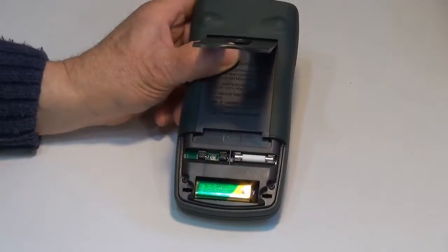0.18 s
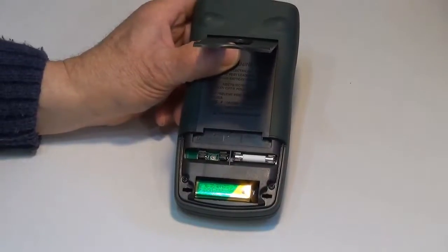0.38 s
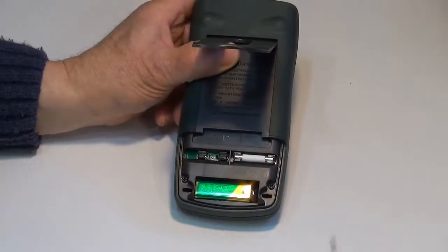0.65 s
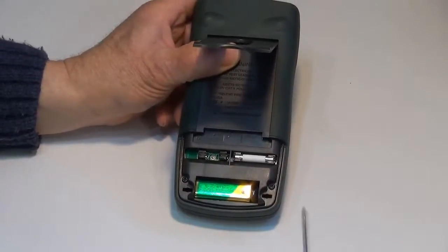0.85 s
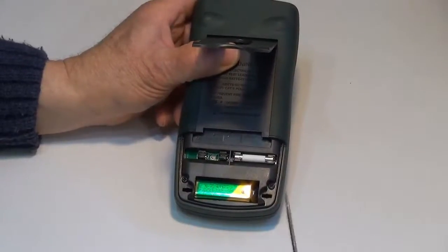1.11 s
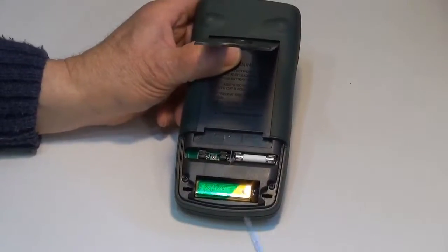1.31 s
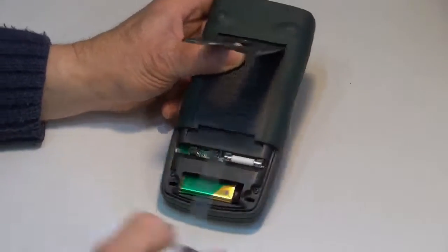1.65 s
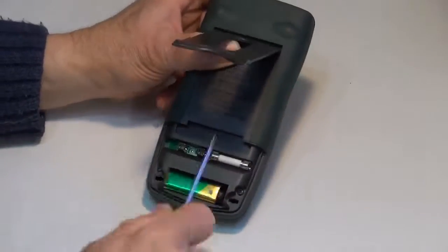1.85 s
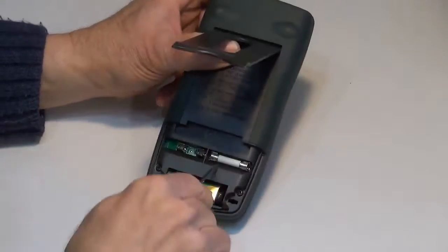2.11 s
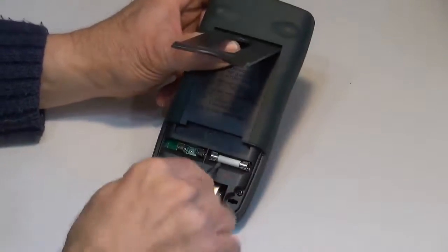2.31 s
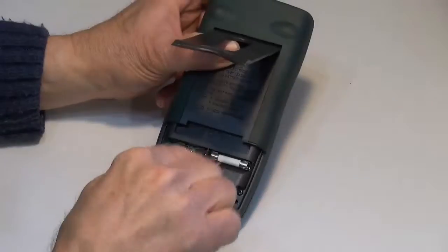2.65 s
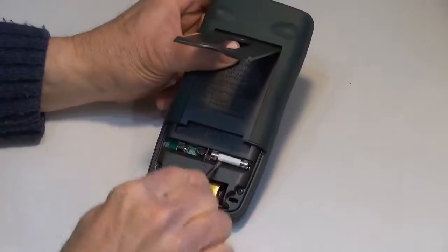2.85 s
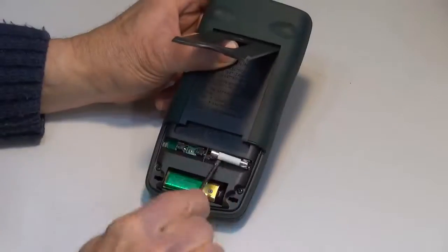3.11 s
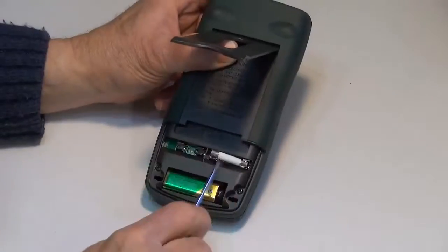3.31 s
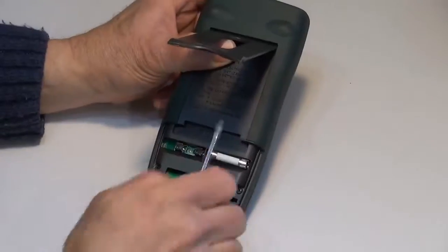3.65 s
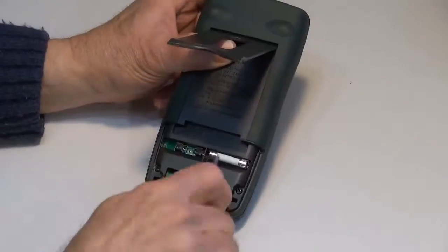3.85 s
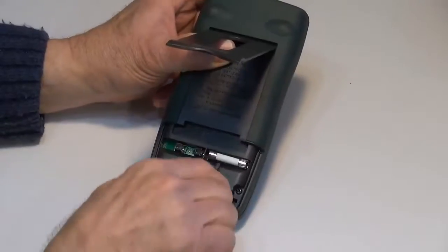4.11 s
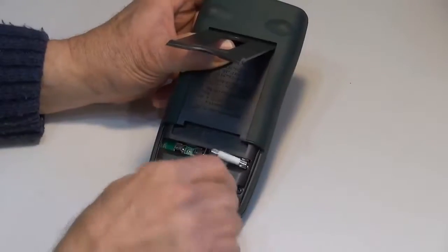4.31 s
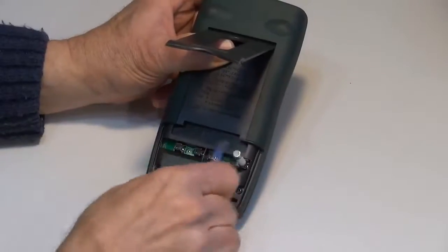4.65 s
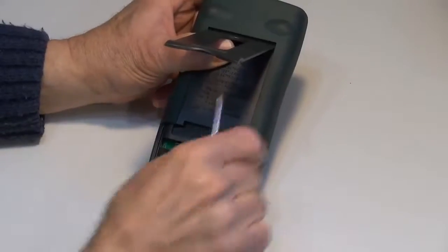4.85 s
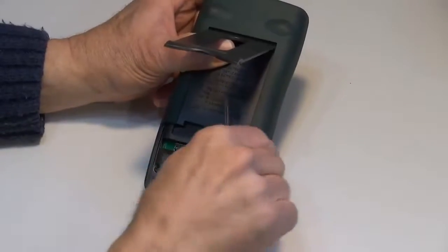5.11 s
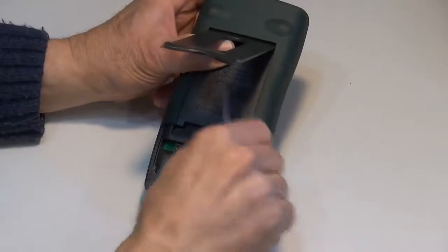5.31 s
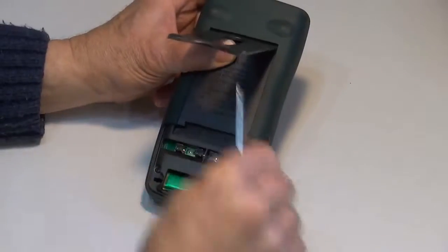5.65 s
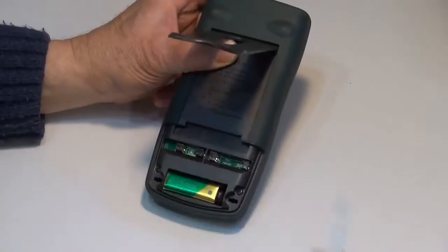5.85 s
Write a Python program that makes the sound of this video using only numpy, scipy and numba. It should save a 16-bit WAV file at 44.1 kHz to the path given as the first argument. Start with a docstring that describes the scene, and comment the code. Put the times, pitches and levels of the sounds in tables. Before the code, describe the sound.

Close, nearly mono sound of a hollow plastic meter being handled on a desk in a small, quiet room, with steady soft hiss and very faint low hum. It opens with a light scuff and faint ticks; at 0.52 s a hard, bright snap breaks into rapid clicks, with rubbing around 0.6, then a hollow clack at 0.93 and tiny ticks to 1.03. Quiet follows, with a soft tap and slide near 1.5 and faint ticks at 1.75. A clack rings briefly at 2.16, with two more near 2.3. Soft scrapes and small knocks from 2.9 lead to a bright metallic snap at 3.38 with a short ring. Then it is nearly still until light prying from 4.1 to 4.6, rubbing with a faint squeaky creak around 4.3. A clack at 5.35 starts the strongest cluster, with a very sharp crack at 5.44 and several snaps to 5.51, ringing shortly, before faint sliding fades into hiss.

```python
"""Levering fuses from a plastic meter

A hand-held plastic meter lies on a desk while a screwdriver levers fuses out of spring clips.
Each click is an impulse exciting damped modes of the hollow case, its stiff panels and the metal parts.
Sliding hands, case and blade rub the same modes with dense noise grains; a clip creaks by random slips
through resonances, and the desk thuds. A small room answers with decaying noise, over steady hiss and mains hum.
"""
import sys
import numpy as np
from scipy import signal
from scipy.fft import rfft, irfft
from scipy.io import wavfile
from scipy.ndimage import uniform_filter1d
from numba import njit

SR = 44100
rng = np.random.default_rng(int(sys.argv[2]) if len(sys.argv) > 2 else 0)


def store_pcm(level_fs):
    """Save levels as 16-bit WAV."""
    pcm = np.round(np.clip(level_fs, -1, 1) * 32767).astype(np.int16)
    wavfile.write(sys.argv[1], SR, np.atleast_2d(pcm).T)


N = 263277  # samples

# Blows on the meter. Each row: start in seconds, panel, hollow and metal peaks in dB,
# hollow, panel and metal notes in Hz, rattle time in ms, level of the notes in dB.
CLICKS = [(0.068, -26, -37, -52, 447, 2400, 5400, 0.92, 3),
          (0.0992, -25.5, -50, -51, 1060, 2090, 5570, 1.7, 12),
          (0.334, -25, -54, -36, 362, 2230, 5530, 1.2, -2),
          (0.5244, -2.5, -25, 0, 463, 2800, 6160, 0.88, 0),
          (0.5285, -15, -26, -15, 459, 2400, 5470, 1.4, 18),
          (0.5566, -7.5, -30.5, -6, 480, 3000, 6100, 0.58, 11),
          (0.5753, -10.5, -49, -12, 880, 4650, 6070, 0.34, 11),
          (0.588, -26, -47, -26, 880, 2900, 6070, 0.5, 10),
          (0.728, -33, -62, -50, 600, 2940, 5600, 0.82, 7),
          (0.905, -20.5, -54, -18, 376, 4570, 7060, 0.55, 8),
          (0.918, -22, -57, -14, 980, 5060, 7060, 0.59, 17),
          (0.9328, -4.5, -9, -18, 629, 2275, 5940, 0.72, 17.5),
          (1.0025, -20, -49, -23, 1010, 4470, 7100, 0.31, 11),
          (1.0098, -20, -41, -32, 1060, 4460, 5450, .4, 15),
          (1.017, -20, -45, -30, 1060, 4450, 5450, 0.71, 9),
          (1.0262, -25, -57, -17, 694, 4700, 5470, 0.57, 21),
          (1.030, -21, -55, -24, 694, 4450, 5770, .5, 12),
          (1.4809, -42, -30.5, -57, 619, 2280, 5540, 0.97, 28),
          (1.7295, -32.5, -50, -58, 610, 4800, 5830, 1.2, 34),
          (1.7753, -26.5, -41, -30, 413, 3480, 5600, 0.84, 21),
          (2.164, -20, -19, -11.5, 685, 2100, 7950, 0.52, 19),
          (2.2831, -18.5, -34.5, -22.5, 745, 2280, 7660, 1, 14),
          (2.3167, -18, -24, -19, 402, 3450, 5670, 0.69, 11),
          (2.9561, -43, -33, -41, 995, 2220, 5780, 2.9, 33),
          (3.0916, -43, -29, -54, 604, 2190, 8500, 1, -10),
          (3.1174, -37.5, -35, -35, 720, 2170, 6100, 2.4, 26),
          (3.2403, -37, -26.5, -41.5, 354, 1720, 5900, 2.1, 17),
          (3.3261, -41, -31, -48, 428, 2540, 5730, 1.9, 22),
          (3.3799, -48, -12.5, -3, 688, 5390, 6345, 0.9, 29.5),
          (4.127, -24.5, -36.5, -32, 355, 2360, 5500, 1.8, 9),
          (4.367, -37, -38, -31.5, 1040, 4900, 5720, 1.7, 36),
          (4.4346, -26.5, -27, -28.5, 707, 3500, 6250, 2.2, 19),
          (4.515, -62, -42.5, -65, 380, 2400, 5600, 1.8, 27),
          (4.534, -62, -38.5, -63, 405, 2390, 5600, 1.5, 33),
          (4.565, -41, -63, -55, 396, 3360, 5600, 1.8, 23),
          (5.3535, -12.5, -13.5, -10.5, 710, 2320, 5500, 2.1, 7),
          (5.4436, 0, -18, -0.1, 810, 4820, 6370, 1.3, -10),
          (5.467, -7, -19, -23, 785, 3810, 6500, 1.6, 30),
          (5.4807, -14, -18.5, -22, 348, 2900, 7200, 1.1, 1),
          (5.504, -10.5, -22, -15, 664, 3790, 7150, 3.2, 42),
          (5.5073, -6, -11, -45, 497, 2270, 6660, 1.9, 5)]
# Damped modes of the air-filled case, its stiff panels and the metal parts.
# Each row: frequency in Hz, 60 dB decay time in seconds (ring() allows no less than 3 ms), level in dB.
HOLLOW_MODES = [(387.5, 0.059, 9.5), (435, 0.074, 2.5), (643, 0.015, 16.5), (648, 0.016, 11),
                (722, 0.0071, 27.5), (860, 0.026, 13.5), (978, 0.099, 7.5)]
PANEL_MODES = [(2130, 0.047, -4.5), (2400, 0.026, 2), (2630, 0.0067, 9.5), (3150, 0.01, 8),
               (3410, 0.019, 2.5), (4070, 0.035, -3), (4350, 0.0094, 2.5), (4770, 0.0027, 3)]
METAL_MODES = [(4970, 0.0018, 9), (6080, 0.0014, -1), (7500, 0.0079, -11), (8880, 0.0013, -12.5)]
# Close pairs of tones that linger after some blows.
# Each row: start in seconds, frequency in Hz, 60 dB decay time in seconds, level in dB.
LINGERING_TONES = [(2.166, 727, .25, -40), (2.166, 2340, 0.13, -42), (3.383, 675, 0.41, -37),
                   (1.481, 580, 0.069, -38), (3.381, 6520, 0.25, -37), (5.355, 2324, 0.023, -15),
                   (5.356, 96, 0.093, -39), (5.446, 2580, 0.088, -23), (5.445, 4950, .08, -25),
                   (5.506, 3865, 0.17, -29), (5.508, 2115, 0.093, -23), (5.508, 2330, 0.091, -32)]
# Scraping and sliding strokes. Each row: start of the hold, hold, rise before it and fall after it in seconds
# (rise and fall span 20 dB), hollow, panel and metal levels in dB, hollow and panel spot centres in Hz.
STROKES = [(0.0, 0.0039, 0.017, 0.11, -30.5, -30.5, -36, 408, 2550),
           (0.149, 0.08, 0.085, 0.019, -50, -40, -54, 850, 2260),
           (0.254, 0.076, 0.061, 0.025, -52.5, -47.5, -79, 940, 2190),
           (0.343, 0.076, 0.012, 0.21, -42.5, -46.5, -47.5, 425, 2730),
           (0.563, 0.0071, 0.092, 0.093, -41.5, -34, -39.5, 816, 2320),
           (.635, 0.02, 0.081, 0.016, -43, -31.5, -38.5, 860, 1980),
           (0.666, 0.22, .05, 0.05, -58, -47, -80, 765, 2080),
           (0.852, 0.04, 0.027, 0.15, -61, -62, -45.5, 460, 3160),
           (0.933, 0.04, 0.084, 0.043, -37, -34.5, -37, 486, 3120),
           (1.004, 0.034, 0.044, 0.075, -46.5, -38, -62, 674, 2750),
           (1.539, 0.036, 0.13, 0.22, -51.5, -42, -51, 670, 3650),
           (2.202, 0.041, 0.015, 0.033, -54.5, -68, -65, 685, 2260),
           (2.353, 0.23, 0.08, 0.039, -53, -60.5, -63.5, 550, 3260),
           (2.546, 0.028, 0.011, 0.01, -49.5, -45, -56, 715, 2930),
           (2.901, .005, 0.06, 0.031, -56, -52, -58, 694, 2450),
           (2.97, .005, 0.053, 0.11, -49, -47.5, -53, 710, 2230),
           (3.094, 0.11, 0.044, 0.024, -49, -55, -58, 610, 2070),
           (3.245, 0.049, 0.03, 0.037, -42, -52, -54, 440, 2480),
           (3.353, 0.0055, 0.046, 0.016, -30.5, -40, -45, 422, 2460),
           (3.364, 0.0023, 0.007, 0.03, -40, -25, -34, 675, 4330),
           (3.377, 0.0049, 0.0035, 0.11, -37.5, -47, -51, 630, 4500),
           (3.584, 0.033, 0.15, 0.24, -61.5, -55.5, -60, 597, 3600),
           (3.906, .01, 0.042, 0.074, -59.5, -54.5, -56, 730, 3770),
           (4.221, 0.097, 0.0082, 0.042, -46, -44.5, -55, 640, 2067),
           (4.336, 0.096, 0.066, 0.055, -47, -48.5, -61, 950, 2190),
           (4.533, 0.019, 0.044, 0.047, -48, -55.5, -58, 430, 2920),
           (4.746, .01, 0.037, 0.059, -84.5, -57.5, -54, 600, 3440),
           (4.998, 0.031, 0.28, 0.039, -50.5, -57.5, -67, 378, 3200),
           (5.349, .005, 0.065, 0.12, -44.5, -48, -46.5, 710, 2670),
           (5.574, 0.016, 0.18, 0.11, -51.5, -53.5, -57, 614, 3460),
           (5.705, 0.018, 0.085, 0.33, -71, -55.5, -59, 625, 3870)]
# The hand, never quite still. The row: hollow, panel and metal levels in dB, hollow and panel spots in Hz.
FIDGET = (-88, -62.5, -72, 619, 3200)
# Resonance at the rubbed spot, for the hollow and then the panels. Each row: width in Hz of one filter pass,
# centre in Hz at which it has that width, power by which width follows centre, level in dB over the modes.
RUBBED_SPOT = [(207, 260, 1.18, 3), (900, 1750, 1.5, 1)]
# Resonances of the strained clip. Each row: frequency in Hz, width in Hz, rms level in dB before its swell,
# start, peak and end of the swell in seconds (an end ahead of the peak cuts the swell short).
CLIP_RESONANCES = [(1175, 41, -48.5, 4.3, 4.33, 4.43), (1980, 71, -46, 4.25, 4.31, 4.39),
                   (2600, 100, -44, 4.29, 5.4, 4.35)]
# Spectra of the hiss in the middle and at the sides. Each row: frequency in Hz, relative density in dB per Hz.
HISS_SPECTRUM = [(18, -57), (30, -23), (123, -8), (314, -7), (355, -6), (726, -7), (1350, -12),
                 (2320, -16.5), (11000, -15.5), (14300, -38), (22000, -120)]
SIDE_HISS_SPECTRUM = [(30, -12), (180, -7), (1050, -8), (11000, -6)]

# Triples run hollow, panels, metal.
FAMILIES = (HOLLOW_MODES, PANEL_MODES, METAL_MODES)
EDGE_HZ = (307, 1446, 6200)  # each family radiates little below this
NOTE_CYCLES = (45, 37, 75)  # cycles in which the note of the struck spot falls 60 dB
CRACK_DB = (-4, -27, 0)  # the bare contact heard beside the modes
METAL_NOTE_DB = -21  # the metal note, against the notes of the case
HOLLOW_LAG_MS = 1.44  # the air in the case answers a moment after the snap
SNAP_MS, SNAP_SIZE, SOFTEN_POWER = 0.025, 2.7, 1.15  # a longer rattle softens the snap by this power
PUSH_MS, PUSH_POWER = 0.17, 0.95  # push time at 1 ms of rattle; a longer rattle lengthens it by this power
THUD_HZ, THUD_DB = 163.8, -28  # the desk under the case; gain against the hollow peak
BEAT = 0.0296  # share by which the tones of a lingering pair lie apart
FLUTTER_DB = 5  # random flutter in the level of the lingering tones
GRAIN_DB = 2.5  # mean of the uneven grain levels, before their cap
WANDER, WANDER_HZ, PATCHY_DB = 0.085, 40.22, 2.5  # the spot strays in pitch and catches unevenly
CREAK_RATE_HZ = 450  # mean number of slips a second
ROOM_T60_S, TREBLE_T60_S, ROOM_SPLIT_HZ, ROOM_DB = 0.2, 0.12, 5100, -10.5
HISS_DB, HUM_HZ, HUM_DB = -56.5, 118, -70
SIDE_DB, SIDE_HISS_DB = -19, -61
CEILING, STOP_HZ = 0.78, 11600


def clicks():
    """Impulsive excitation: a snap and brief rattle strike the modes, the struck spot's notes and the desk."""
    out = np.zeros(N + 9000)
    ms = np.arange(1500) / SR * 1000
    for start_s, panel_db, hollow_db, metal_db, *note_hz, rattle_ms, note_db in CLICKS:
        start = int(start_s * SR)
        snap = ms / SNAP_MS * np.exp(-ms / SNAP_MS) * (2 - ms / SNAP_MS)
        snap *= SNAP_SIZE / rattle_ms ** SOFTEN_POWER
        rattle = ms / rattle_ms * np.exp(-ms / rattle_ms) * rng.standard_normal(len(ms))
        contact = snap + rattle  # the rough contact drives the stiff parts
        push = ms * np.exp(-ms / (PUSH_MS * rattle_ms ** PUSH_POWER))  # smooth force on the hollow case
        forces = (push, contact, contact)
        peaks_db = (hollow_db, panel_db, metal_db)
        notes_db = (note_db, note_db, note_db + METAL_NOTE_DB)
        for k, modes in enumerate(FAMILIES):
            body = ring(modes, 2, 0.03)
            body += ring([(note_hz[k], NOTE_CYCLES[k] / note_hz[k], notes_db[k])], 0, 0)
            body[0] += undb(CRACK_DB[k])
            wave = radiate(signal.fftconvolve(forces[k], body), EDGE_HZ[k])
            lag = int(HOLLOW_LAG_MS * SR / 1000) if k == 0 else 0
            at = start + lag
            out[at:at + len(wave)] += wave * undb(peaks_db[k]) / np.abs(wave).max()
        thud = radiate(ring([(THUD_HZ, 0.12, 0), (1.5 * THUD_HZ, 0.1, 0)], 0.4, 0.13), 100)
        out[start:start + len(thud)] += thud * undb(hollow_db + THUD_DB)
    return out[:N]


def rings():
    """Beating: two close modes swell within three cycles and decay together; their level flutters at random."""
    size = 15000
    out = np.zeros(N + size)
    for start_s, hz, t60, db in LINGERING_TONES:
        start = int(start_s * SR)
        pair = ring([(hz, t60, db), (hz * (1 + BEAT), t60, db - 4)], 1, 0.004, size=size)
        swell = np.minimum(np.arange(size) / SR * hz / 3, 1)
        out[start:start + size] += pair * swell
    return out[:N] * undb(FLUTTER_DB * walk(2 * WANDER_HZ))


def ring(modes, scatter_db, detune, size=3000):
    """Modal superposition: an impulse response of damped sines, weighted and detuned afresh at each call."""
    hz, t60, db = np.transpose(modes)[:, :, None]
    chance = rng.standard_normal((2, len(modes), 1))
    t = np.arange(size) / SR
    decay = np.exp(-np.log(1000) * t / np.maximum(t60, 0.003))
    wave = np.sin(2 * np.pi * hz * (1 + detune * chance[0]) * t) * decay
    return np.sum(undb(db + scatter_db * chance[1]) * wave, axis=0)


def radiate(x, hz):
    """Radiation cut-off: a small body pushes little air at low pitch, hence a steep high-pass."""
    return signal.sosfilt(signal.butter(N=4, Wn=hz, btype="high", fs=SR, output="sos"), x)


def scrape():
    """Frictional excitation: dense uneven grains rub the modes and a gliding resonance at the rubbed spot."""
    gains, spots_hz = strokes()
    grain_levels = np.minimum(rng.exponential(size=N // 24 + 1), 4)
    grain_size = undb(GRAIN_DB * np.repeat(grain_levels, 24)[:N])
    grains = rng.standard_normal((3, N)) * grain_size
    rubs = []
    for k, modes in enumerate(FAMILIES):
        damped = [(hz, 0.27 * t60, db) for hz, t60, db in modes]  # the touching hand damps the modes
        rubbed = signal.fftconvolve(grains[k], ring(damped, 0, 0))[:N]
        rubs.append(level(radiate(rubbed, EDGE_HZ[k]), 0))
    for k, centre_hz in enumerate(spots_hz):
        width, at_hz, power, db = RUBBED_SPOT[k]
        width = width * (centre_hz / at_hz) ** power
        hz = centre_hz * np.exp(WANDER * walk(WANDER_HZ))
        spot = resonance(resonance(grains[k], hz, width), hz, width)
        patchy = spot * undb(PATCHY_DB * walk(WANDER_HZ))
        rubs[k] = level(rubs[k] + level(patchy, db), 0)
    return sum(rub * gain for rub, gain in zip(rubs, gains))


def strokes():
    """Incoherent addition: the powers of rising, held and falling strokes add and weight the rubbed spot."""
    t = np.arange(0, N, 32) / SR
    start, hold, rise, fall, *rest = np.transpose(STROKES)[:, :, None]
    levels_db, centres_hz = np.array(rest[:3]), rest[3:]
    early = np.maximum(start - t, 0) / rise
    late = np.maximum(t - start - hold, 0) / fall
    power = undb(2 * (levels_db - 20 * (early + late)))
    idle = undb(2 * np.array(FIDGET[:3]))[:, None]
    total = power.sum(axis=1) + idle
    spots = []
    for k in range(2):
        weighted = np.sum(power[k] * centres_hz[k], axis=0) + idle[k] * FIDGET[3 + k]
        spots.append(weighted / total[k])

    def smooth(rows):
        """Linear interpolation from the coarse time grid to every sample."""
        return [np.interp(np.arange(N) / SR, t, row) for row in rows]

    return smooth(np.sqrt(total)), smooth(spots)


def creak():
    """Stick-slip: the levered clip slips in uneven jerks that ring its narrow, straying resonances."""
    t = np.arange(N) / SR
    slips = (rng.random(N) < CREAK_RATE_HZ / SR) * rng.standard_normal(N)
    out = np.zeros(N)
    for hz, width, db, *times in CLIP_RESONANCES:
        straying_hz = hz * np.exp(0.036 * walk(WANDER_HZ / 2))
        tone = resonance(slips, straying_hz, np.full(N, 1. * width))
        swell_power = np.interp(t, times, (0, 1, 0.5), left=0, right=0)
        out += np.sqrt(swell_power) * level(tone, db)
    return out


@njit
def resonance(x, hz, width):
    """Forced resonance: a state-variable band-pass whose centre (Hz) and width (Hz) move."""
    y, band, low = np.empty(len(x)), 0., 0.
    for i in range(len(x)):
        g = np.tan(np.pi * hz[i] / SR)
        k = width[i] / hz[i]
        v = (band + g * (x[i] - low)) / (1 + g * (g + k))
        band, low = 2 * v - band, low + 2 * g * v
        y[i] = k * v
    return y


def walk(rate_hz):
    """Random modulation: chance levels joined by straight ramps, with a spread near 1."""
    k = int(SR / rate_hz)
    held = np.repeat(rng.standard_normal(N // k + 1), k)
    return 1.27 * uniform_filter1d(held, k)[:N]


def room(x):
    """Diffuse reverberation: exponentially decaying noise whose treble dies sooner than its bass."""
    t = np.arange(SR // 2) / SR
    onset = np.clip((t - 0.002) / 0.00079, 0, 1)
    noise = rng.standard_normal(len(t)) * onset
    low = signal.lfilter(*signal.butter(N=2, Wn=ROOM_SPLIT_HZ, fs=SR), noise)
    tail = low * np.exp(-np.log(1000) * t / ROOM_T60_S)
    tail += (noise - low) * np.exp(-np.log(1000) * t / TREBLE_T60_S)
    return undb(ROOM_DB) * signal.fftconvolve(x, tail / np.sqrt(np.sum(tail ** 2)))[:N]


def background():
    """Stationary noise and a steady pitch: coloured hiss and a mains hum that wavers in level."""
    waver = uniform_filter1d(np.repeat(rng.standard_normal(N // 3000 + 1), 3000), 3000)[:N]
    hum = np.sin(2 * np.pi * HUM_HZ * np.arange(N) / SR) * undb(3.1 * waver)
    return level(coloured(HISS_SPECTRUM), HISS_DB) + level(hum, HUM_DB)


def coloured(points):
    """Spectral shaping: white noise weighted through points of (Hz, dB)."""
    hz, db = np.transpose(points)
    f = np.maximum(np.arange(N // 2 + 1) * SR / N, 1)
    gain = undb(np.interp(np.log(f), np.log(hz), db))
    return irfft(rfft(rng.standard_normal(N)) * gain, N)


def undb(db):
    """Logarithmic level: decibels to amplitude gain."""
    return 10 ** (np.asarray(db) / 20)


def level(x, db):
    """Effective value: scale a signal to an rms level in dB."""
    return x * undb(db) / np.sqrt(np.mean(x ** 2))


def scene():
    """Superposition in mid and side: all sources central, with a trace of treble and some hiss at the sides."""
    bench = clicks() + rings() + scrape() + creak()
    mid = bench + room(bench) + background()
    smear = rng.standard_normal(120) * np.hanning(120)
    smear /= np.sqrt(np.sum(smear ** 2))
    side = undb(SIDE_DB) * signal.fftconvolve(radiate(bench, 11000), smear)[:N]
    side += level(coloured(SIDE_HISS_SPECTRUM), SIDE_HISS_DB)
    return np.array([mid + side, mid - side])


def record(dry):
    """Saturation and band limiting: round the loudest peaks between two steep low-pass filters."""
    top = signal.cheby2(16, 65, STOP_HZ, fs=SR, output="sos")
    rounded = CEILING * np.tanh(signal.sosfilt(top, dry) / CEILING)
    return signal.sosfilt(top, rounded)


dry = scene()
out = record(dry)
store_pcm(out)
```